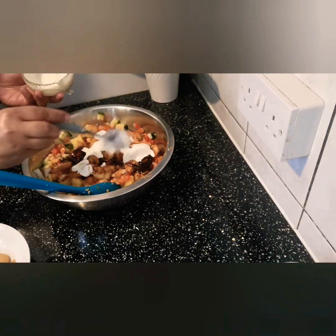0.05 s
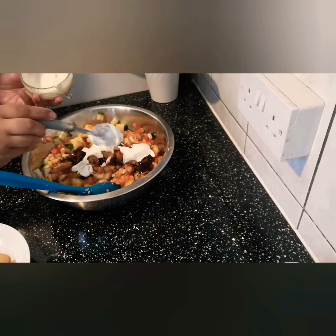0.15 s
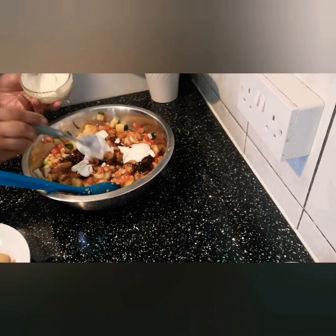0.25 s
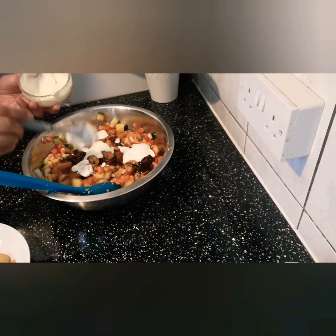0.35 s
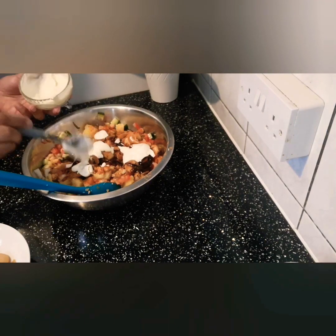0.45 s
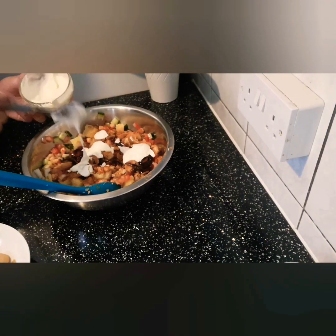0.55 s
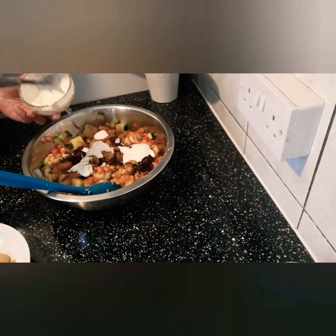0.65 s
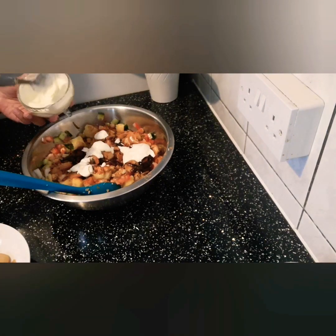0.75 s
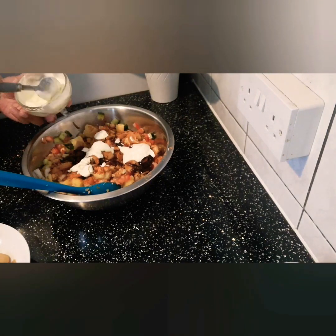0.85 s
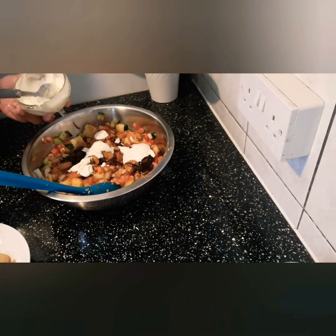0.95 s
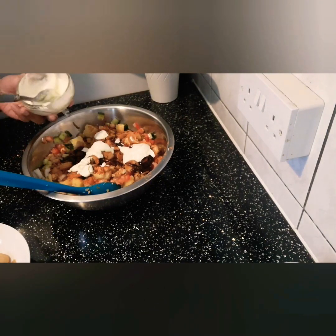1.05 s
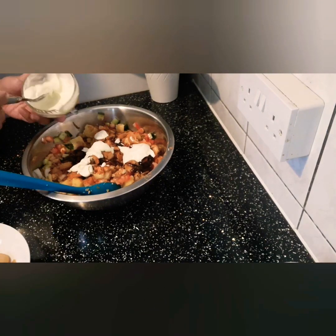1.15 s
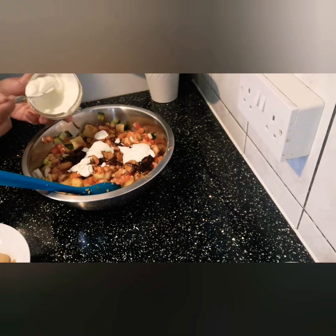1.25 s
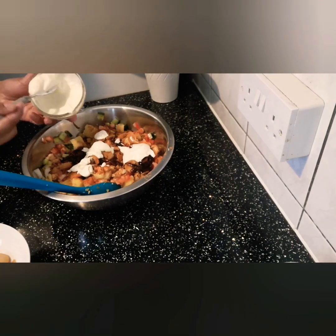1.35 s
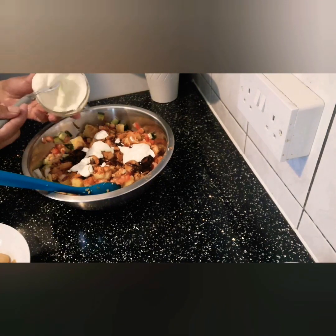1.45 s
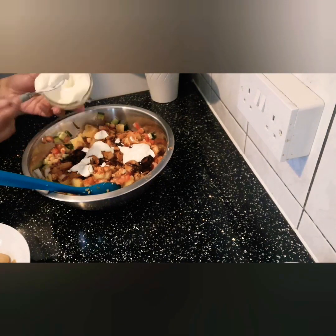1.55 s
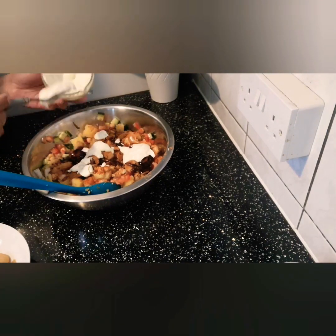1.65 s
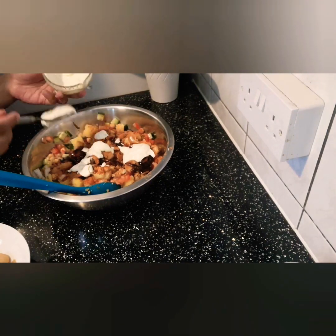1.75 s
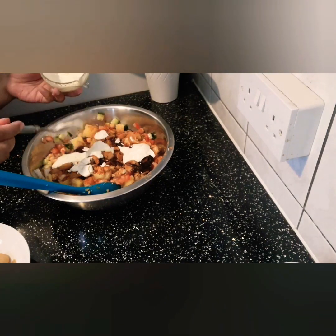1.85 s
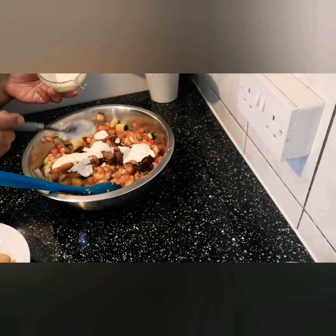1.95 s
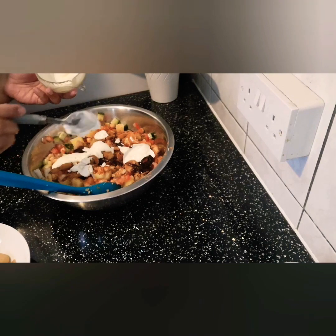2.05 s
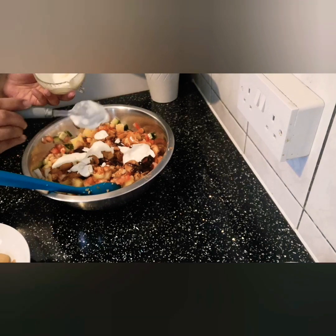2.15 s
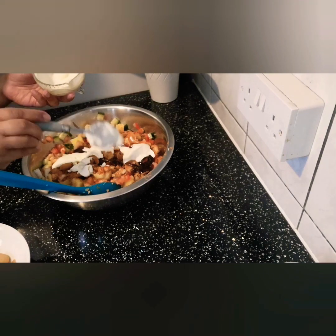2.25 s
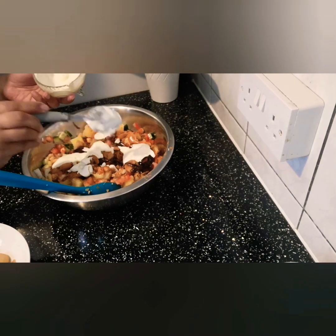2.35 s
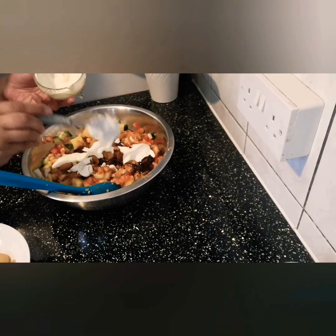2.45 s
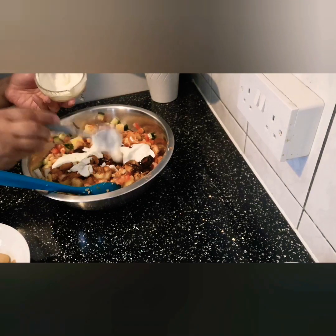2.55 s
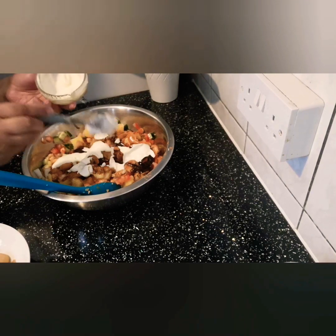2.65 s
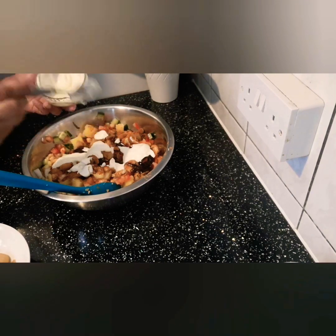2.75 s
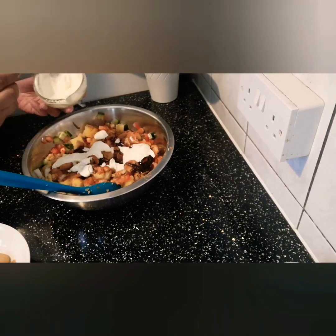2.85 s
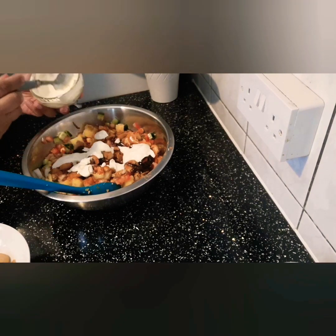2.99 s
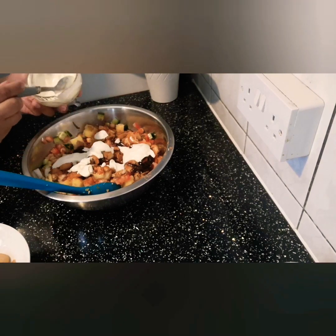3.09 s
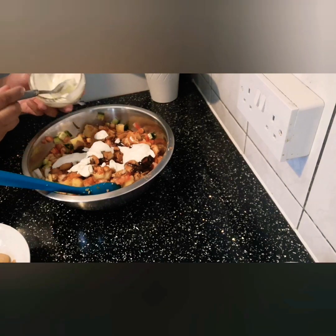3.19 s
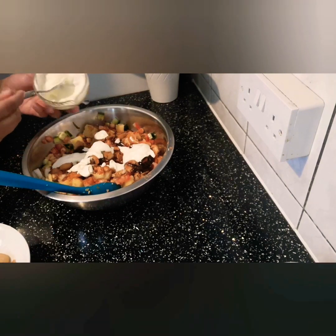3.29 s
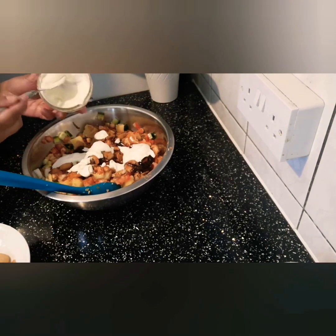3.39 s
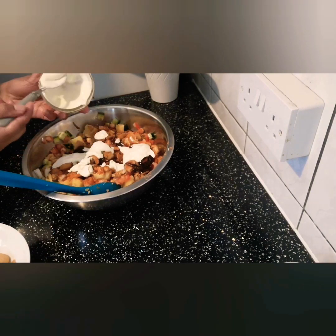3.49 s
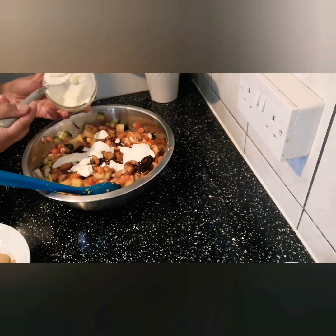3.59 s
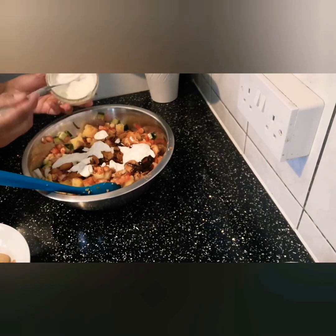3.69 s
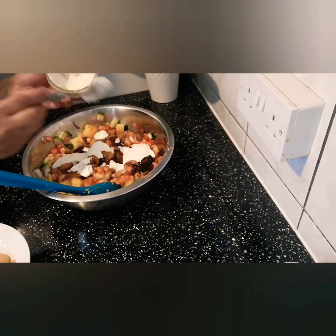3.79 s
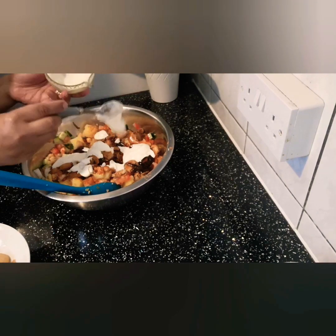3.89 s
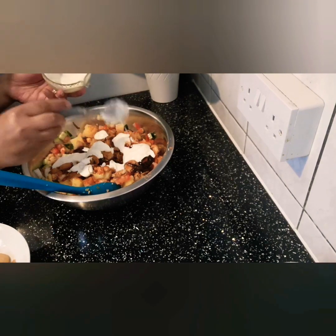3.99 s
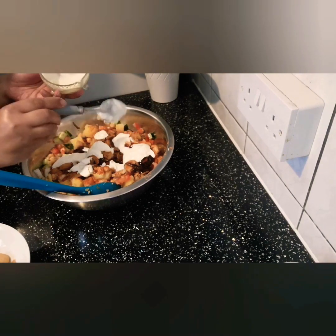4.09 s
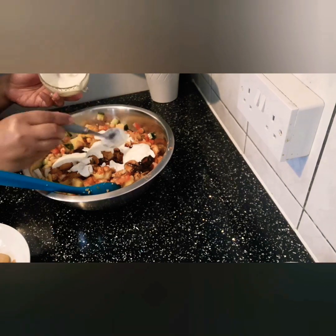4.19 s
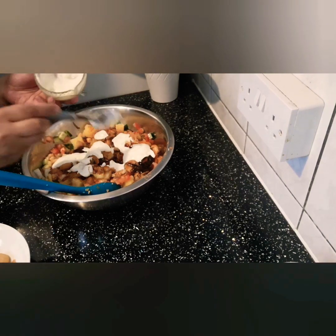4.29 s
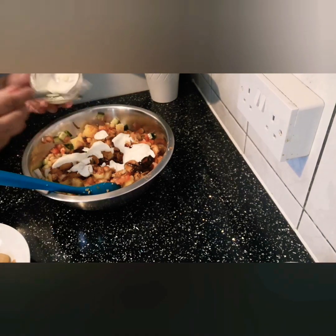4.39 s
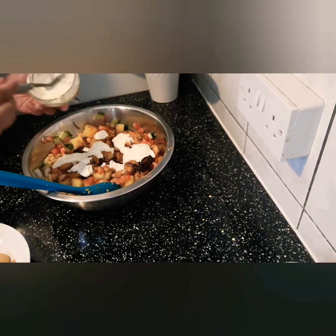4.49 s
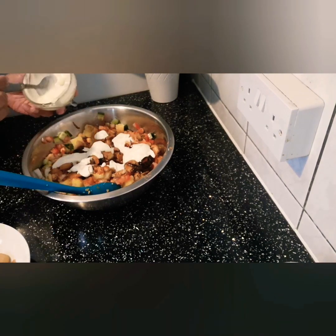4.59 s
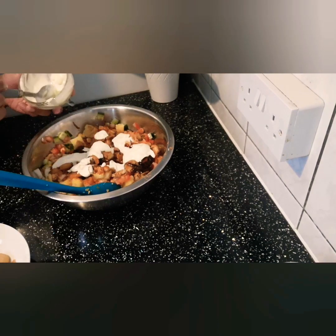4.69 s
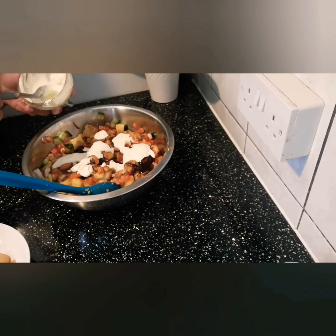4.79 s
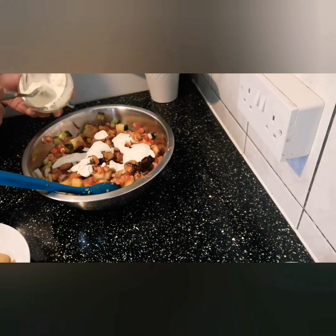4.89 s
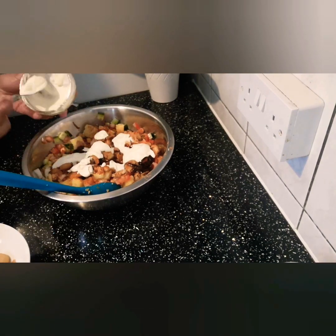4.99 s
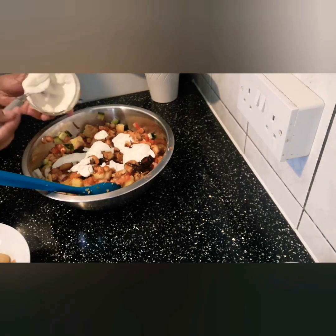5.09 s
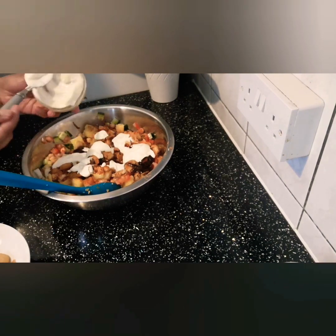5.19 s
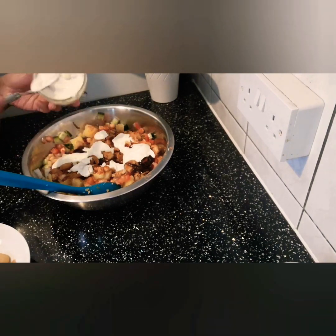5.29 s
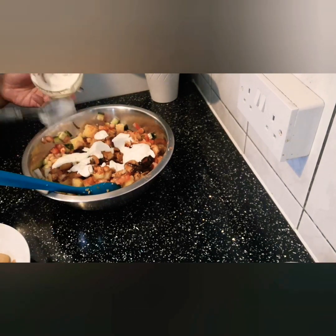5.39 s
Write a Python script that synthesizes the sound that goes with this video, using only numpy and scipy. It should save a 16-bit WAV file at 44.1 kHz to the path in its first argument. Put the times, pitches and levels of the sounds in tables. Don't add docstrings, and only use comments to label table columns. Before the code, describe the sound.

Close stereo pickup in a small tiled kitchen, dish to the left. Faint sleeve and creamy scooping rustle comes first, then a steel spoon taps a glass rim at one second and strikes it hardest just after. Quiet rubbing follows, two hard clinks past three seconds, another near 4.7, and a short rattling slide after five, all over a faint low fridge hum.

```python
import sys
import numpy as np
from scipy import signal
from scipy.fft import rfft, irfft
from scipy.io import wavfile
from scipy.ndimage import uniform_filter1d

SR = 44100
rng = np.random.default_rng(int(sys.argv[2]) if len(sys.argv) > 2 else 0)


def store_pcm(level_fs):
    pcm = np.round(np.clip(level_fs, -1, 1) * 32767).astype(np.int16)
    wavfile.write(sys.argv[1], SR, np.atleast_2d(pcm).T)


def convert_level_to_amplitude(level_db):
    exponent = np.asarray(level_db, float) / 20
    return 10 ** exponent


N = 239769

# start_s, first_ring_db, first_ring_hz, second_ring_hz, second_over_first_db
RIM_BLOWS = [(1.1453, -29, 1950, 4688, 8), (1.1453, -29.5, 1793, 4640, -14), (1.1842, -30, 1950, 4800, -30),
             (1.2214, -42, 2015, 4600, -12.5), (1.4155, -42.5, 1970, 4770, -17),
             (3.1472, -43.5, 1936, 4860, 0), (3.2031, -41.5, 1905, 4940, -18),
             (3.3732, -22.5, 1990, 4766, -11.5), (4.7436, -23, 1994, 4774, -7),
             (4.7805, -60, 1970, 4850, -16), (5.0144, -41.5, 1760, 4650, -5),
             (5.022, -35.5, 1753, 4840, -2), (5.1198, -28, 2196, 4900, -9.5)]
# t60_s, twin_pitch_factor, twin_level_db
GLASS_MODES = [(0.029, 1.035, -7.5), (0.044, 1.014, -9.5), (0.022, 1.1, -12)]
# start_s, swell_s, fade_s, peak_db, first_ring_hz
CHATTERS = [
    (1.423, 0.016, .025, -49, 1935),
    (5.1063, 0.044, .06, -29.5, 1998),
]
# start_s, level_db at 2.8 kHz, then over it thud_db, clack_db, edge_db
SPOON_BLOWS = [(0.9576, -35.5, 6, 2, -0.5), (0.971, -62, -30, -30, -8), (1.1429, -26, -18, -3, -5.5),
               (3.1467, -32, -7, -14, -10), (3.176, -54, -23, 2, -12), (3.2026, -46.5, -14, -1, -0.5),
               (3.371, -29, -13.5, -7.5, -23), (4.7162, -33.5, -2, -4.5, -1.5), (4.7253, -54, -15, -3, -4),
               (4.742, -44, 3, 13, 11.5), (4.759, -63, -6, -15, 1), (4.9301, -56, -22, -20.5, -24),
               (5.014, -39, -11, 6.5, -7), (5.0193, -26, -21, -42, -25), (5.1235, -34, -9, 4.5, -12),
               (5.1353, -35, -8, -19, -8), (5.1485, -41, -6, -13, -18)]
# level, thud, clack, edge, top [pitch_hz]
COLOUR_HZ = [2800, 1200, 5600, 7300, 10500]
# pitch_hz, level_db
CRACK = [(650, -40), (950, -4), (1500, -3), (2100, -7), (3000, -3), (4200, -6), (8500, -3), (9200, -8),
         (13000, -12), (14000, -45)]
# start_s, level_db
TICK = (1.1433, -20.5)
# (pitch_hz, level_over_blow_db)
GRIPS = [
    (.9, [(1222, -7), (2790, 5), (2950, 1.5), (4790, -1), (5780, -3), (7120, -4.5), (9300, -2.5)]),
    (1.1, [(2570, -1), (2980, -2), (3420, -13), (5670, -5), (6560, -14), (6940, -12), (7320, -10.5)]),
    (3.1, [(1675, -7), (2814, -6.5), (2920, -9), (5450, -9.5), (7700, -12)]),
    (3.3, [(1507, -13.5), (2870, -4.5), (3650, -34), (5760, -6.5), (7050, -15)]),
    (4.7, [(1430, 3.5), (1710, -3), (2810, 5.5), (4090, 1.5), (5370, 0), (7110, -2.5), (10530, -8)]),
    (4.735, [(1410, -6), (3030, -7), (4200, 1), (5400, -2), (6870, -0.5), (7440, -8), (8380, 7), (10750, -12.5), (12400, -18)]),
    (4.9, [(2640, -1)]),
    (5.0, [(2782, 2), (5450, -5.5), (5750, -5)]),
    (5.1, [(2770, -1), (5550, -1), (5800, 0), (7000, -8.5), (12700, -27)]),
]
# start_s, level_db, pitch_hz
KNOCKS = [
    (1.244, -60, 817),
    (1.274, -62, 806),
    (1.508, -67, 724),
    (1.68, -67, 830),
    (2.091, -68, 783),
    (4.93, -55, 2670),
    (4.95, -58, 2720),
]
# delay_s, level_db
ECHOES = [(.0011, -11), (.0019, -11), (.0031, -10), (.0047, -11), (.0085, -10), (.013, -9), (.019, -12)]
# pitch_hz, t60_s
KITCHEN_T60 = [(500, 0.46), (1000, 0.37), (2000, 0.34), (4500, 0.32), (8000, 0.27), (14000, 0.21)]
# middle_s, half_length_s, rub_db, hiss_db, rub_centre_hz
MOVES = [(0.0, 0.14, -81, -81.5, 3020), (0.316, 0.16, -79.5, -85.5, 2000),
         (0.648, 0.073, -70.5, -82.5, 2970), (0.875, 0.091, -85, -81, 2360), (1.82, 0.2, -75, -79, 2370),
         (1.992, 0.076, -66.5, -84, 2440), (2.12, 0.14, -77.5, -84.5, 2500), (2.35, .07, -83, -80.5, 2240),
         (2.617, 0.04, -74.5, -79.5, 2400), (2.864, 0.21, -77.5, -82, 2150),
         (3.988, 0.042, -82, -71.5, 2420), (4.074, 0.099, -82, -74, 2200), (4.406, 0.13, -85, -99, 1800),
         (5.297, 0.15, -78, -76.5, 2460), (5.44, 0.066, -66.5, -78, 2430)]
# rub_db, hiss_db, rub_centre_hz
REST = (-85, -87, 2600)
# centre_hz, width_hz, level_db
HISS = [(5600, 1200, -1.5), (7430, 1140, 3.5)]
# pitch_hz, level_db (rms), waver_width_hz
HUM = [(100.8, -61.5, 6), (166.2, -69, 2.8), (200.2, -75, 4.5), (301.5, -83.5, 5.9), (437, -84, 12)]
# pitch_hz, level_db (per Hz)
RUMBLE = [(12, -42), (25, -25.5), (38, -18), (50, -12.5), (62, -15), (80, -18.5), (120, -7), (150, -16.5),
          (200, -16), (250, -19), (275, -28.5), (440, -24.5), (600, -31), (800, -78)]
# pitch_hz, level_db (per Hz)
AIR = [(290, -19), (500, -12), (698, -2.5), (1130, -3), (1230, -0.5), (1550, -4.5), (1790, 0.5),
       (2570, -5.5), (4340, -9.5), (7000, -15), (10200, -21.5), (14500, -26.5), (16000, -20.5)]
# pitch_hz, likeness (share)
SAME = [(25, .995), (60, 0.9), (130, 1), (290, 0.68), (600, 0.37), (3000, 0.05), (15000, 0.12)]
# pitch_hz, level_db
LEFT_DB = [(60, -1.5), (150, 0), (380, 4), (950, 4.5), (2380, 4.0), (5980, 5), (15000, -1.5)]

LAG = 26
ALL_ROUND_HZ = 330
SLIDE_FROM_S = 5.0
THIRD_RING, THIRD_DB = 1.74, -4
SECOND_RING, SECOND_DB = 2.47, -17
CHATTER_THIRD_DB = -9
CHATTER_GAP_S, SWELL_DB, FADE_DB_PER_S = 0.0069, -1.5, 162
ROCK, ROCK_HZ, UNEVEN = 0.034, 47.05, 0.4
HELD_T60_S = 0.019
TOP_DB = -13
DENSE = 0.6
RUB_WIDTH = 0.35
RUMBLE_DB, AIR_DB, AIR_TOP_HZ = -63, -69, 15700


def evened(x):
    return x / np.sqrt(np.mean(x ** 2) + 1e-20)


def read(points, hz):
    f, value = np.transpose(sorted(points))
    return np.interp(np.log(hz + 1), np.log(f + 1), value)


def add(mix, s, sound):
    part = mix[round(s * SR):][:len(sound)]
    part += sound[:len(part)]


def ring(hz, db, t60, rise_s):
    t = np.arange(SR // 5) / SR
    decay = convert_level_to_amplitude(db - 60 * t / max(t60, 0.005))
    return decay * np.sin(2 * np.pi * hz * t) * (1 - np.exp(-t / rise_s))


def contacts():
    rows = [(*blow, THIRD_DB) for blow in RIM_BLOWS]
    for start, swell_s, fade_s, peak_db, hz in CHATTERS:
        for t in np.arange(0, swell_s + fade_s, CHATTER_GAP_S):
            swell_db = min(SWELL_DB * (1 - t / swell_s), 0)
            db = peak_db + swell_db - FADE_DB_PER_S * max(t - swell_s, 0)
            rock = np.sin(2 * np.pi * ROCK_HZ * t)
            s = start + t + UNEVEN * rock * CHATTER_GAP_S
            rows.append((s, db, hz * (1 + ROCK * rock), SECOND_RING * hz, SECOND_DB, CHATTER_THIRD_DB))
    return rows


def glass():
    out = np.zeros(N)
    for s, db, first_hz, second_hz, second_db, third_db in contacts():
        rise_s = 0.004 if s > SLIDE_FROM_S else 0.0012
        modes = [(first_hz, db),
                 (second_hz, db + second_db),
                 (THIRD_RING * second_hz, db + second_db + third_db)]
        for (hz, mode_db), (t60, split, twin_db) in zip(modes, GLASS_MODES):
            twin = ring(hz * split, mode_db + twin_db, t60, rise_s)
            add(out, s, ring(hz, mode_db, t60, rise_s) + twin)
    damped = signal.butter(6, 9300, fs=SR, output="sos")
    return convert_level_to_amplitude(-1.5) * signal.sosfilt(damped, out)


def spoon():
    out = np.zeros(N)
    t, hz = np.arange(1024) / SR, np.fft.rfftfreq(1024, 1 / SR)
    noises = rng.standard_normal((len(SPOON_BLOWS), 1024))
    for (s, db, *rel_db), noise in zip(SPOON_BLOWS, noises):
        rise_s = 0.004 if s > SLIDE_FROM_S else 0.001
        modes = [modes for start, modes in GRIPS if start < s][-1]
        for f, mode_db in modes:
            add(out, s, ring(f, db + mode_db - 0.5, HELD_T60_S, rise_s))
        levels = [db, *(db + np.array(rel_db)), db + rel_db[-1] + TOP_DB]
        colour = list(zip(COLOUR_HZ, levels))
        crack = convert_level_to_amplitude(-60 * t / 0.022) * noise * (1 - np.exp(-t / rise_s))
        crack = np.roll(crack, 64)
        z = rfft(crack)
        z = z * (np.linalg.norm(crack) / (abs(z) + 1e-9)) ** DENSE
        add(out, s - 64 / SR, irfft(z * convert_level_to_amplitude(10.0 + read(colour, hz) + read(CRACK, hz))))
    return out


def knocks():
    out = np.zeros(N)
    for s, db, hz in KNOCKS:
        add(out, s, ring(hz, db + 7.5, 0.025, 0.0014))
    return out


def kitchen(x):
    taps = np.zeros((2, SR // 2))
    jitter = rng.integers(0, 20, (2, (SR // 2 - 301) // 20))
    at = np.arange(300, SR // 2 - 20, 20) + jitter
    np.put_along_axis(taps, at, rng.choice([-1., 1.], at.shape), 1)
    hz, t, z = signal.stft(taps, SR, nperseg=256)
    decay = convert_level_to_amplitude(-60 * t / read(KITCHEN_T60, hz)[:, None])
    tail = signal.istft(z * decay, SR, nperseg=256)[1]
    tail *= convert_level_to_amplitude(4.5) / np.linalg.norm(tail[0])
    for (s, db), spread in zip(ECHOES, rng.uniform(-1, 1, (len(ECHOES), 4))):
        delay = np.round(s * SR * (1 + 0.15 * spread[:2])).astype(int)
        tail[[0, 1], delay] += convert_level_to_amplitude(db) * np.sign(spread[2:])
    nearer_db = [[2.2], [-2.2]]
    return signal.fftconvolve(x[None], tail * convert_level_to_amplitude(nearer_db), axes=1)[:, :N]


def noise_pair(magnitude, patchy_db, size=1024):
    hop = size // 4
    frames, hz = N // hop + 5, np.fft.rfftfreq(size, 1 / SR)
    a, b, c, d, patches = rng.standard_normal((frames, len(hz), 5)).T
    patches = uniform_filter1d(patches, 14, 0)
    patches = evened(uniform_filter1d(patches, 12 * 1024 // size, 1))
    same = np.clip(read(SAME, hz), -1, 1)[:, None]
    lead = 2 * np.pi * hz * LAG / SR / (1 + (ALL_ROUND_HZ / (hz + 1)) ** 4)
    left = a + 1j * b
    right = same * left + np.sqrt(1 - same ** 2) * (c + 1j * d)
    right = right * np.exp(-1j * lead)[:, None]
    half = convert_level_to_amplitude(read(LEFT_DB, hz)[:, None] / 2)
    z = np.array([left * half, right / half]) * convert_level_to_amplitude(patchy_db * patches)
    z *= magnitude(hz[:, None], np.arange(frames) * hop / SR)
    return signal.istft(z, nperseg=size, noverlap=size - hop)[1][:, :N]


def rustle():
    def band(hz, bumps):
        shape = sum(convert_level_to_amplitude(db) * np.exp(-((hz - f) / width) ** 2) for f, width, db in bumps)
        return shape / np.linalg.norm(shape, axis=0)

    def magnitude(hz, t):
        swells = [(np.exp(-((t - s) / half_s) ** 2), *move) for s, half_s, *move in MOVES]
        swells.append((np.ones_like(t), *REST))
        power = 0
        for swell, rub_db, hiss_db, f in swells:
            rub = convert_level_to_amplitude(rub_db) * band(hz, [(f, RUB_WIDTH * f, 0)])
            hiss = convert_level_to_amplitude(hiss_db) * band(hz, HISS)
            power = power + swell ** 2 * (rub + hiss) ** 2
        return np.sqrt(power)

    return convert_level_to_amplitude(10.0) * noise_pair(magnitude, patchy_db=3.0)


def fridge():
    t, out = np.arange(N) / SR, np.zeros(N)
    for hz, db, width in HUM:
        drift = rng.standard_normal((N // 64 + 2, 2)) @ [1, 1j]
        pole = np.exp(-np.pi * abs(width) * 64 / SR)
        drift = signal.lfilter([1], [1, -pole], drift)
        drift = np.repeat(drift / np.sqrt(np.mean(abs(drift) ** 2)), 64)[:N]
        line = ((1 + 0.3 * drift) * np.exp(2j * np.pi * hz * t)).real
        out += convert_level_to_amplitude(db) * evened(line)
    return signal.oaconvolve(out, np.hanning(48) / 21.9, "same")


def room_tone():
    rumble = noise_pair(lambda hz, t: convert_level_to_amplitude(read(RUMBLE, hz)), patchy_db=1.0, size=4096)
    air = noise_pair(lambda hz, t: convert_level_to_amplitude(read(AIR, hz)) * (hz < AIR_TOP_HZ), patchy_db=2.4)
    return convert_level_to_amplitude(RUMBLE_DB) * evened(rumble) + convert_level_to_amplitude(AIR_DB + 3.5) * evened(air)


def scene():
    dish = convert_level_to_amplitude(-2.0) * (glass() + spoon() + knocks())
    shadow_db = -7
    direct = convert_level_to_amplitude(9.5) * np.array([dish, convert_level_to_amplitude(shadow_db) * np.roll(dish, LAG)])
    tick_s, tick_db = TICK
    add(direct[0], tick_s, convert_level_to_amplitude(tick_db) * np.array([1., -1.]))
    return direct + kitchen(dish) + rustle() + fridge() + room_tone()


def low_pass(x):
    return signal.sosfilt(signal.butter(12, 16850, fs=SR, output="sos"), x)


def record(dry):
    treble = np.diff(dry, prepend=0)
    power = uniform_filter1d((treble ** 2).mean(0), 900)
    level_db = 10 * np.log10(abs(power) + 1e-14)
    opened = 1 / (1 + np.exp(-(level_db + 61.5) / 1.6))
    mix = dry * convert_level_to_amplitude(3.44 * opened - 1.0)
    return low_pass(mix)


dry = scene()
out = record(dry)
store_pcm(out)
```